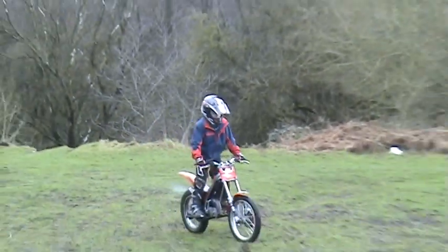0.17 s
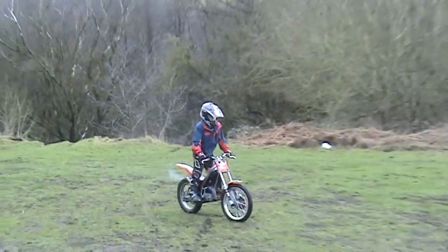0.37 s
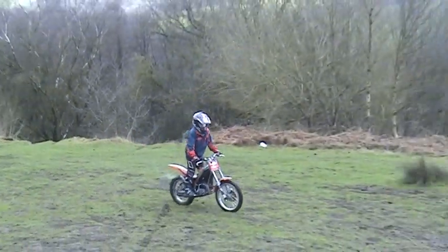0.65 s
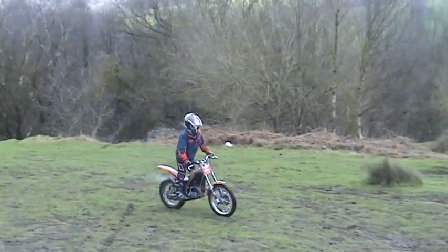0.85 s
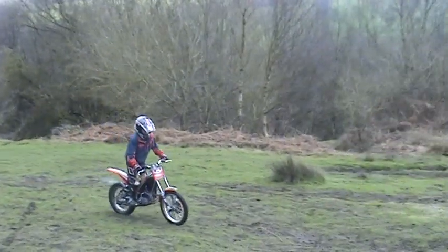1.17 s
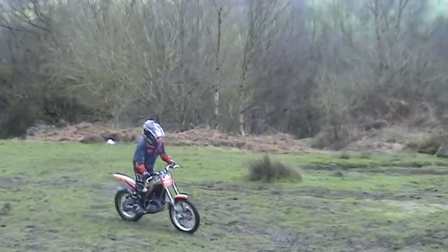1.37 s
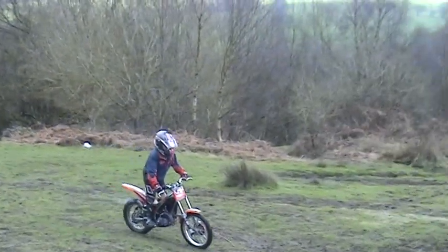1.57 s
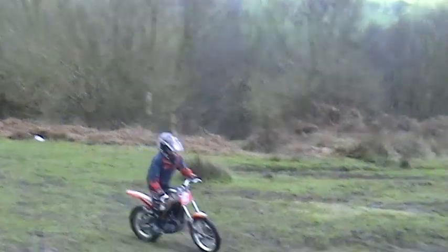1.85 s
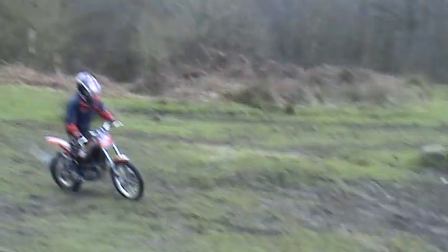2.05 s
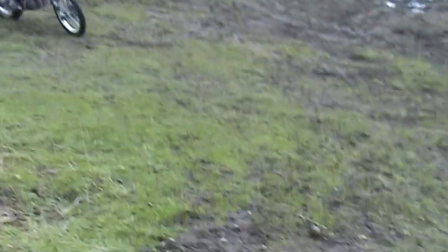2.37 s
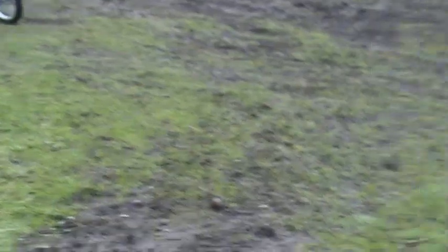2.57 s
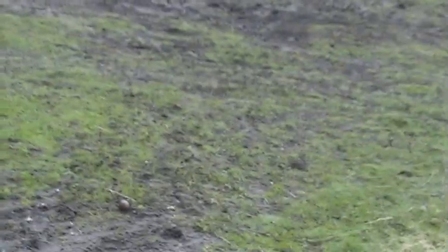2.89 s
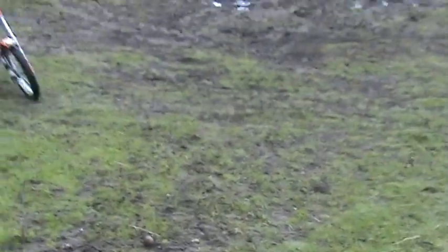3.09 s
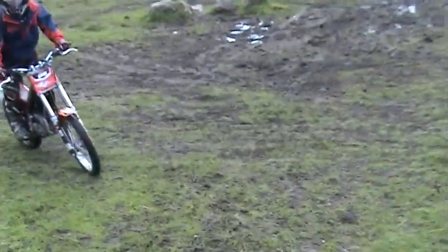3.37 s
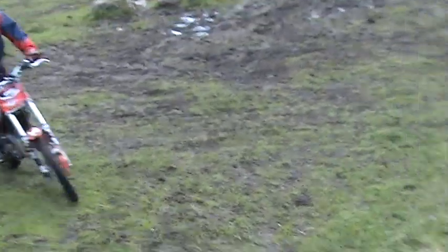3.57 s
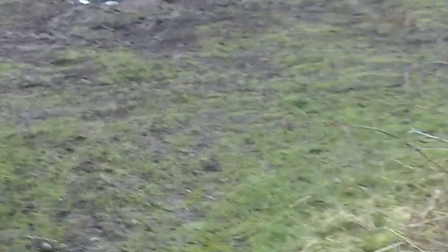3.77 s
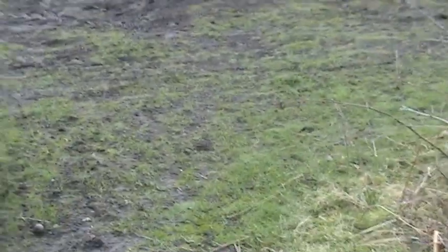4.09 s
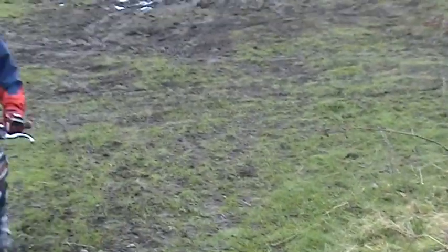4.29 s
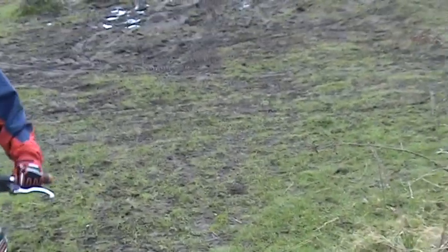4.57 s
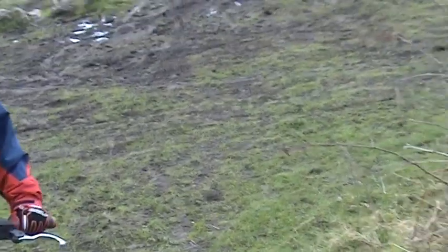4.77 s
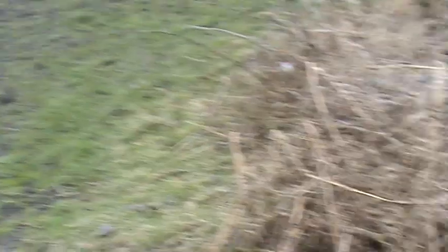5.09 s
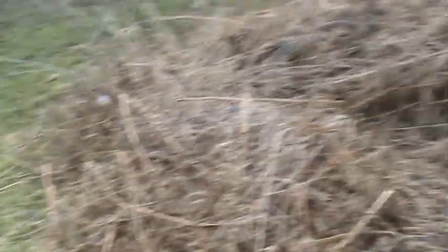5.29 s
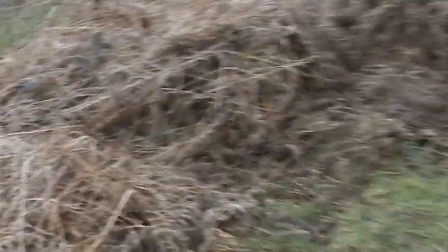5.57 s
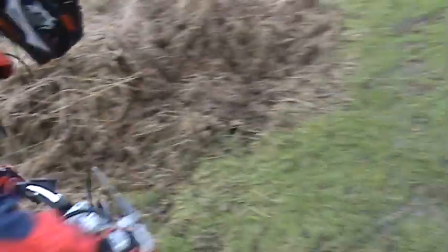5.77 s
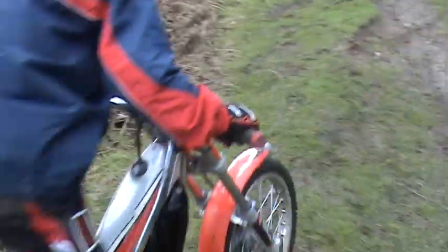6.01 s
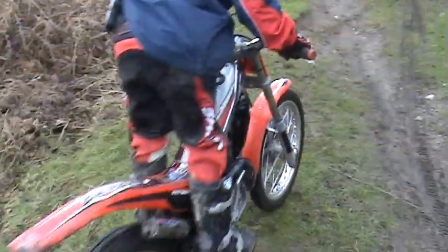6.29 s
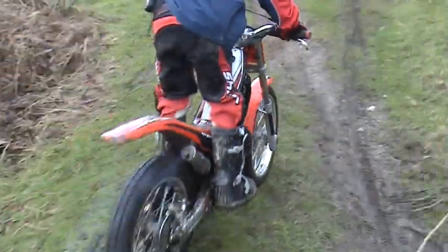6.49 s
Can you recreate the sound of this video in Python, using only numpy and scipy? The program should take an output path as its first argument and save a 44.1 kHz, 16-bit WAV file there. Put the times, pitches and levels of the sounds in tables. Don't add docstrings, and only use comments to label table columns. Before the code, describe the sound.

A small two-stroke motorcycle is already running at 0 s, at moderate distance on open wet grass, with around 85 to 90 exhaust pulses a second blurred into a dry, crackling, metallic buzz. A single feeble pulse slips by near 0.2 s. At about 1.85 s the spark fails for less than a tenth of a second, leaving a little hole with faint ringing, and the engine catches again slightly lower and recovers. Around 2.4 s it dulls slightly. From 3.3 s the pitch edges up and from 4 s a hollow, boxy intake tone and deeper boom come forward. Revs dip briefly near 4.8 s, then rise again. From 5.6 to 6.3 s the bike passes very close, loudest, slightly left, full of bright crackle, hiss and rattle, and eases towards 6.6 s. Soft wind rumbles low in the microphone throughout.

```python
import sys
import numpy as np
from scipy import signal
from scipy.fft import rfft, irfft, next_fast_len
from scipy.io import wavfile
from scipy.ndimage import uniform_filter1d, map_coordinates

SR = 44100
rng = np.random.default_rng(int(sys.argv[2]) if len(sys.argv) > 2 else 0)


def inscribe(sig):
    pcm = np.round(np.clip(np.atleast_2d(sig).T, -1, 1) * 32767)
    wavfile.write(sys.argv[1], SR, pcm.astype(np.int16))


def boost_factor(decibels):
    exponent = np.asarray(decibels, float) / 20
    return 10 ** exponent


N = 292824

# (last firing before [s], first firing after [s])
MISFIRE = (1.8337, 1.9198)
# (time [s], pipe level [dB], left-right difference [dB],
# share of the pipe mouth in view [0-1], ground echo delay [ms])
PASS = [(0, -27.5, 0, 0.58, 0.52), (.65, -28.5, -1, 0.71, 0.54), (1, -28.5, 0, 0.79, .48),
        (1.8, -28.5, -0.5, 0.76, 0.53), (2.1, -29, 0.5, 0.7, 0.46), (2.41, -31.5, 1.5, 0.57, 0.51),
        (3, -30, 2, 0.55, 0.56), (3.44, -29, 0, 0.32, 0.85), (3.84, -30.5, 2, 0.14, 0.99),
        (4.2, -29, 1, 0.08, 1.31), (4.63, -29, 1, 0, 0.51), (4.75, -26, 1, 0.03, 1.084),
        (5.26, -28.5, 3, 0.35, 1.584), (5.72, -24, 4, 0.58, 2.35), (5.92, -21.5, 4.5, .7, 2.22),
        (6.35, -22.5, 1, 0.6, 2.2), (6.46, -24.5, .5, 0.79, 2.11), (6.64, -27.5, -1, .7, 1.58)]


def unit(x):
    return x / np.sqrt(np.mean(x ** 2) + 1e-20)


def curves(rows, s=None):
    at, *columns = np.transpose(rows)
    s = np.arange(N) / SR if s is None else s
    return [np.interp(s, at, column) for column in columns]


def wobble(rate, s=None):
    fine = np.arange(0, N / SR + .01, .002)
    smooth = unit(map_coordinates(rng.standard_normal(200), [fine * rate]))
    return np.interp(np.arange(N) / SR if s is None else s, fine, smooth)


def swells(rows):
    t = np.arange(0, N / SR + .01, .002)
    humps = sum(height * np.exp(-abs((t - s) / half) ** 3) for s, half, height in rows)
    return np.interp(np.arange(N) / SR, t, humps)


def coloured(x, spectrum):
    m = next_fast_len(N + 8192)
    hz, db = np.transpose(spectrum)
    log_hz = np.log(np.fft.rfftfreq(m, 1 / SR) + 1)
    gain = boost_factor(np.interp(log_hz, np.log(hz + 1), db))
    return irfft(rfft(x, m) * gain, m)[..., :N]


def mix(a, b, share):
    share = np.clip(share, 0, 1)
    return np.sqrt(share) * a + np.sqrt(1 - share) * b


def laid_out(rows, times, colour):
    at = np.ceil(times * SR).astype(int)[:, None] + np.arange(rows.shape[1])
    train = np.bincount(at.ravel(), rows.ravel(), N + 2000)[:N]
    return unit(coloured(train, colour))


def wind():
    # (frequency [Hz], level [dB per Hz])
    air = [(10, -30), (30, -8), (60, -9), (120, -3.5), (250, -1), (450, -8), (900, -28)]
    gusts = boost_factor(0.5 * np.array([wobble(3.04), wobble(5.34)]))
    pair = unit(coloured(rng.standard_normal((2, N)), air)) * gusts
    ports = unit(coloured(rng.standard_normal(N), [(10, -8), (35, 6), (70, -14), (150, -42)]))
    return boost_factor(-48) * (pair + 0.54 * pair[::-1]) + boost_factor(-64) * np.array([ports, -ports])


def speed():
    # (time [s], firings a second [Hz])
    ride = [(0, 83.16), (.74, 86.7), (1.03, 84.95), (1.55, 88.17), (1.83, 85.2), (2.12, 90.45),
            (2.55, 89.13), (2.75, 87.25), (3.33, 88.87), (3.62, 94.46), (4.12, 91.55), (4.4, 93.8),
            (4.8, 84.9), (5.06, 90.64), (5.29, 92.7), (5.72, 92.8), (5.97, 94.32), (6.64, 88.53)]
    # (time [s],
    # half length [s], change [Hz])
    jolts = [
        (.17, 0.074, -.8),
        (2.63, 0.06, -0.36),
        (3.21, .08, 1.7),
    ]
    sag_hz, recover_s = 10, .19
    last, first = MISFIRE
    sag = np.interp(np.arange(N) / SR, [last, first, first + recover_s], [0, 1, 0])
    return curves(ride)[0] + swells(jolts) - sag_hz * sag


def crank():
    # (time [s], level [dB])
    weak = [
        (.182, -10),
    ]
    t = np.arange(N) / SR
    turns = np.cumsum(speed()) / SR
    last, first = np.interp(MISFIRE, t, turns)
    missing = round(first - last)
    slip = missing - (first - last)
    turns = turns - last + slip * np.interp(t, MISFIRE, [0, 1])
    whole = np.arange(np.ceil(turns[0]), turns[-1])
    times = np.interp(whole, turns, t)
    size = np.where((whole > 0) & (whole < missing), 0., 1.)
    for s, db in weak:
        size[np.argmin(abs(times - s))] = boost_factor(db)
    return turns, times, size


def firing():
    last, first = MISFIRE
    corners = [last + 0.0059, last + 0.035, first - 1 / SR, first]
    return np.interp(np.arange(N) / SR, corners, [1, 0, 0, 1])


def rattle(turns, spectrum, depth_db, fade):
    beat = np.exp(-(turns % 1) / fade) + .45 * np.exp(-((turns + .5) % 1) / fade)
    noise = rng.standard_normal(N) * boost_factor(depth_db * beat + 0.38 * wobble(22))
    return unit(coloured(noise, spectrum))


def fins(times, size, colour, t60):
    rows = rng.standard_normal((len(times), 800))
    rows = uniform_filter1d(uniform_filter1d(rows, size=12, axis=0), size=8, axis=0)
    decay = boost_factor(-60 * np.arange(rows.shape[1]) / SR / t60)
    return laid_out(rows * decay * size[:, None], times, colour)


def rings(times, size, hz, modes, colour, drift_db, scatter_db, detune, spike=0., rise=.0001):
    step = np.arange(560)
    t = ((np.ceil(times * SR)[:, None] + step) / SR - times[:, None]).astype(np.float32)
    rows = -spike * np.exp(-((t - .0001) / .00004) ** 2)
    for ratio, db, t60 in modes:
        luck = rng.standard_normal((len(times), 2))
        gain = boost_factor(db + drift_db * wobble(2.495, times) + scatter_db * luck[:, 0])
        turn = (2 * np.pi * ratio * hz * (1 + detune * luck[:, 1])).astype(np.float32)
        shape = boost_factor(-60 * t[0] / t60) * (1 - np.exp(-t[0] / rise))
        rows -= gain[:, None] * shape * np.sin(turn[:, None] * t)
    return laid_out(rows * size[:, None], times, colour)


def air_box(turns, times, size):
    # (time [s], level [dB], resonance [Hz], lower mode [Hz])
    intake = [(0, -29, 1193, 634), (.98, -33, 1306, 503), (1.4, -32, 1320, 496), (1.9, -34, 1323, 520),
              (1.97, -28.5, 1280, 584), (2.3, -34.5, 1126, 516), (2.75, -31.5, 1175, 510),
              (3.2, -30, 1066, 670), (3.95, -21.5, 1053, 829), (4.57, -19.5, 1184, 781),
              (4.8, -22, 888, 760), (5.05, -26, 785, 694), (5.22, -26.5, 1067, 687), (5.62, -27, 1084, 475),
              (5.86, -29.5, 949, 720), (6.0, -24, 1310, 654), (6.36, -25, 1314, 630),
              (6.64, -28.5, 1270, 680)]
    # (multiple of the resonance, level [dB], time to fall 60 dB [s])
    upper_modes = [(0.836, -4, 0.016), (1.014, -4, 0.023), (1.17, -3, 0.0048)]
    # (multiple of the lower mode, level [dB], time to fall 60 dB [s])
    lower_modes = [(0.781, 4, 0.014), (1.009, 1.5, 0.029), (1.22, -5, 0.016)]
    # (frequency [Hz], level [dB])
    box_wall = [(150, -60), (420, -37), (530, 4), (1500, 6), (2200, -49), (6000, -50)]
    # (frequency [Hz], level [dB per Hz])
    casing_tone = [(300, -34), (550, -13), (900, -6), (1250, 2.5), (1500, -2), (2200, -49)]
    # (time [s], half length [s], change [dB])
    lower_swells = [(.1, 0.36, 4.5), (1.5, 0.85, -3), (2.3, 0.19, 2.5), (3.0, 0.48, -10), (4.3, 0.44, -1),
                    (5.2, 0.27, 9), (5.98, .17, -1), (6.35, 0.21, -3)]
    level_db = curves(intake)[0]
    lower_db = curves(PASS)[0] - 3 + swells(lower_swells) - level_db
    _, upper_hz, lower_hz = curves(intake, times)
    pops = rings(times, size, upper_hz, upper_modes, box_wall,
                 drift_db=3.0, scatter_db=0.37, detune=0.0084, rise=0.00088)
    lower = rings(times, size, lower_hz, lower_modes, box_wall,
                  drift_db=3.0, scatter_db=1.5, detune=0.0014, rise=0.00019)
    ringing = fins(times, size, casing_tone, t60=.07)
    buzz = rattle(turns, casing_tone, depth_db=1.5, fade=.3)
    casing = mix(ringing, buzz, .65 * firing())
    return boost_factor(level_db) * mix(pops + boost_factor(lower_db - 1.8) * lower, casing, 0.62 * firing())


def boom(turns, times, size):
    orders = (1, 2, 3, 4, 5, 8, 10, 14)
    orders_db = (-52, -39.5, -38, -54.5, -60.5, -67.5, -66.5, -57.5)
    # (time [s], half length [s], change [dB])
    swells_1 = [
        (4.8, 0.35, 7.5),
        (5.3, .12, -3.5),
        (6.1, .58, 11),
    ]
    swells_2 = [
        (3.982, 0.56, 13.5),
        (5.0, 0.53, 5.5),
        (5.63, 0.224, -10.5),
        (6.15, 0.13, 4.5),
        (6.499, 0.19, -6),
    ]
    swells_3 = [(2.4, 0.14, 2), (3.1, .35, 4.5), (4.0, 0.66, 12.5), (4.851, 0.27, 9), (5.3, .2, 3),
                (5.72, 0.32, 9.5), (6.29, 0.074, -12), (6.5, .36, -7)]
    swells_4 = [(2.45, .2, 4), (2.902, 0.14, 8), (3.9, .45, -8), (4.85, 0.16, 6.5), (5.65, 0.54, 25.5),
                (6.35, 0.12, -20)]
    swells_5 = [
        (5.68, 0.77, 27.53),
    ]
    swells_8 = [(.12, 0.28, 16), (4.3, 0.7, 26), (5.15, 0.26, 32), (6.05, 0.31, 37.4)]
    swells_10 = [(4.92, 0.13, 28.8), (5.72, 0.67, 29), (6.35, 0.097, 24)]
    swells_14 = [(6.0, 0.14, 32.4), (6.28, 0.19, 30.7), (6.6, 0.13, 31.2)]
    paths = (swells_1, swells_2, swells_3, swells_4, swells_5, swells_8, swells_10, swells_14)
    chamber_hz, chamber_width_hz, chamber_db = 239.5, 13.3, 10
    unfired_db = -11
    hz = speed()
    missed = np.interp(np.arange(N) / SR, times, 1 - size)
    tones = np.zeros(N)
    for order, far_db, path in zip(orders, orders_db, paths):
        resonance = np.exp(-((order * hz - chamber_hz) / chamber_width_hz) ** 2)
        db = far_db + swells(path) + unfired_db * missed + chamber_db * resonance
        tone = np.sin(2 * np.pi * order * turns + 2.417 * (order - 1))
        tones += np.sqrt(2) * boost_factor(db + 0.6 * wobble(17)) * tone
    return tones


def tail_pipe(turns, times, size):
    # (multiple of the resonance, level [dB], time to fall 60 dB [s])
    low_modes = [(0.754, -15.5, 0.059), (0.923, -15, 0.01), (1.005, 5.5, 0.023), (1.18, -5.5, 0.0077),
                 (1.389, -12, 0.065), (1.581, -9.5, 0.069), (1.699, -16, 0.14)]
    # (frequency [Hz], level [dB], time to fall 60 dB [s])
    high_modes = [(6360, 5, 0.0023), (6720, 0.5, 0.025), (7170, -0.5, 0.0033), (8640, -10.5, 0.013),
                  (11250, -13, 0.054)]
    # (frequency [Hz], level [dB], time to fall 60 dB [s])
    whistle_modes = [(5286, 4.5, 0.046), (5616, -7, 0.034), (5470, 8, 0.045)]
    # (frequency [Hz], level [dB])
    mouth = [(150, -61), (400, -19), (900, 4), (1600, -6), (8500, 4), (10500, -4.5), (12500, -30),
             (14500, -55), (17000, -120)]
    # (frequency [Hz], level [dB per Hz])
    dull_tone = [(1200, -31), (1650, -2), (2050, -4.5), (2550, 4), (3000, -5.5), (3600, -3.5), (4100, -5.5),
                 (4700, -11.5), (5600, -79)]
    bright_tone = [(3800, -72), (4700, -8.5), (5400, -3), (6600, -2.5), (8100, -9), (9000, -11),
                   (10500, -43)]
    gas_tone = [(7800, -52), (9000, -1.5), (10000, 2), (11500, -5), (13000, -28), (15700, -45),
                (17000, -120)]
    # (time [s], half length [s], change [dB])
    hiss_swells = [(.35, 0.22, 2.5), (2.5, 0.47, 3.5), (3.4, 0.48, 1.5), (5.72, 0.3, -3.5),
                   (6.55, 0.12, 5.5)]
    # (time [s], half length [s], change [dB])
    whistle_swells = [(.65, 0.061, 2), (1.2, 0.27, 4), (2.75, 0.1, -19), (2.9, 0.15, 6), (4.75, .2, 7),
                      (5.78, 0.37, 6), (6.46, 0.054, 3.5)]

    low_db, _, share, delay_ms = curves(PASS)
    fired = firing()
    hiss_db = swells(hiss_swells)
    high_db = low_db - 5.5 + 2.5 * share + hiss_db / 2
    whistle_db = -6.5 + swells(whistle_swells)
    gas_db = -9.5 - 19 * share + 4.5 * delay_ms + hiss_db

    size = size * boost_factor(.5 * rng.standard_normal(len(times)))
    pipe_hz = 2529 + 34 * wobble(2.5, times)
    low = rings(times, size, pipe_hz, low_modes, mouth,
                drift_db=2.2, scatter_db=0.04, detune=0.0031, spike=4.8)
    high = rings(times, size, 0.97, high_modes, mouth,
                 drift_db=-5.6, scatter_db=1.3, detune=0.0022, spike=8.4, rise=.00003)
    whistle = rings(times, size, 0.97, whistle_modes, mouth,
                    drift_db=-1.0, scatter_db=2.0, detune=0.0027, rise=.00006)
    crack = boost_factor(low_db) * (low + boost_factor(whistle_db - 2.5) * whistle) + 0.73 * boost_factor(high_db) * high
    crack = np.sqrt(np.clip(share, 0, 1)) * crack
    echo = np.interp(np.arange(N) - delay_ms * SR / 1000, np.arange(N), crack)

    dull_ringing = fins(times, size, dull_tone, t60=.055)
    dull_rattle = rattle(turns, dull_tone, depth_db=4, fade=.25)
    dull = mix(dull_ringing, dull_rattle, .8 * fired)
    bright_ringing = fins(times, size, bright_tone, t60=.045)
    bright_rattle = rattle(turns, bright_tone, depth_db=10 * share, fade=.25)
    bright = mix(bright_ringing, bright_rattle, .65 * fired)
    metal = boost_factor(low_db - 7.27 * (0.5 - fired)) * dull + boost_factor(high_db + 5.0 - 13.5 * (1 - fired)) * bright
    metal = np.sqrt(np.clip(1 - share, 0, 1)) * metal
    gas = rattle(turns, gas_tone, depth_db=24 * share * fired, fade=.35)
    gas = boost_factor(low_db + gas_db + 1.5 - 10 * (1 - fired)) * gas
    return 1.01 * (crack + 0.78 * echo) + metal + gas


def scene():
    # (frequency [Hz], side against middle [dB])
    side_tone = [(60, -21), (110, 13), (200, -39.5), (380, -23), (700, -22.5), (1290, -24), (2380, -21),
                 (4400, -18.5), (8120, -19), (15000, -2)]
    turns, times, size = crank()
    low = boom(turns, times, size)
    bright = air_box(turns, times, size) + tail_pipe(turns, times, size)
    pan = curves(PASS)[1] / 2
    t = np.arange(2000) / SR
    bushes = rng.standard_normal((2, len(t))) * boost_factor(-60 * t / 0.31)
    bushes /= np.linalg.norm(bushes, axis=1)[:, None]
    wet, side = signal.fftconvolve(bright[None], bushes, axes=1)[:, :N]
    side = boost_factor(3 + 3.5 * np.clip(pan, -1, 1)) * coloured(side, side_tone)
    side = side + boost_factor(-25.5) * np.roll(low, 60)
    middle = low + boost_factor(-15) * wet
    return middle + bright * boost_factor([pan, -pan]) + np.array([side, -side]) + wind()


def low_pass(x):
    return signal.sosfilt(signal.butter(12, 15710, fs=SR, output="sos"), x)


def record(dry):
    # (frequency [Hz], level [dB])
    microphone = [(10, -11), (60, -1), (11500, 1.5), (13000, 5.5), (15000, -8), (16500, -40)]
    limited = dry / (1 + abs(dry / .6) ** 4) ** (1 / 4)
    return low_pass(coloured(limited, microphone))


dry = scene()
out = record(dry)
inscribe(out)
```